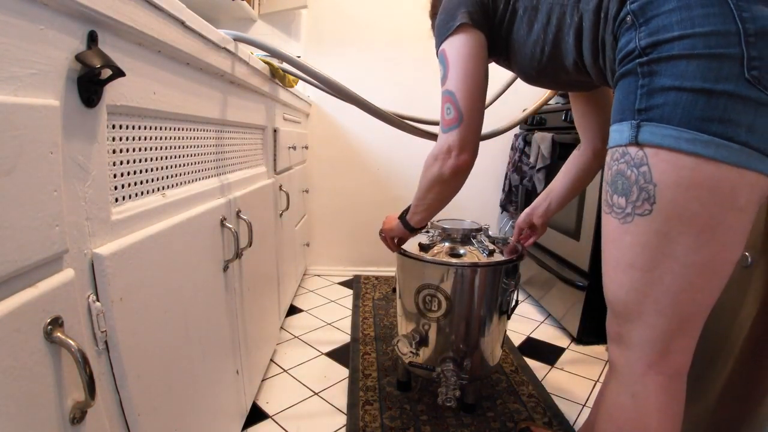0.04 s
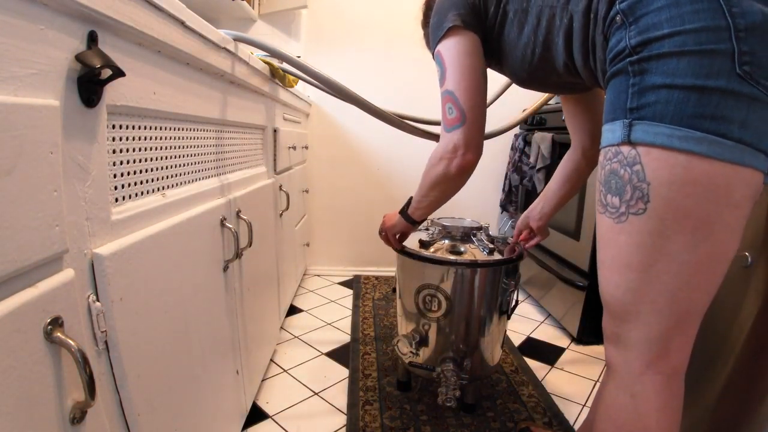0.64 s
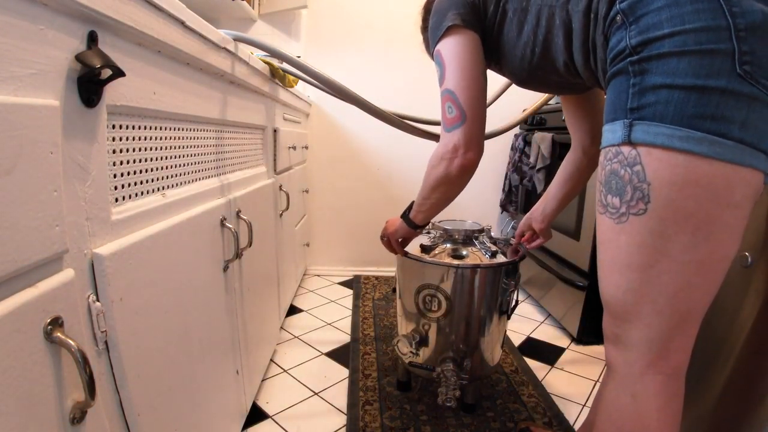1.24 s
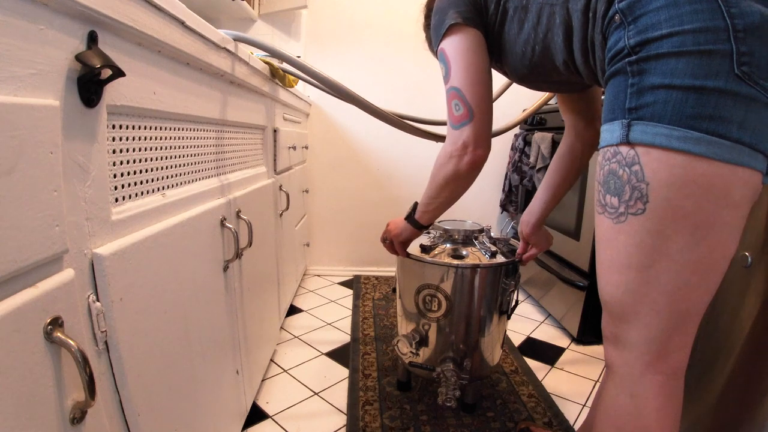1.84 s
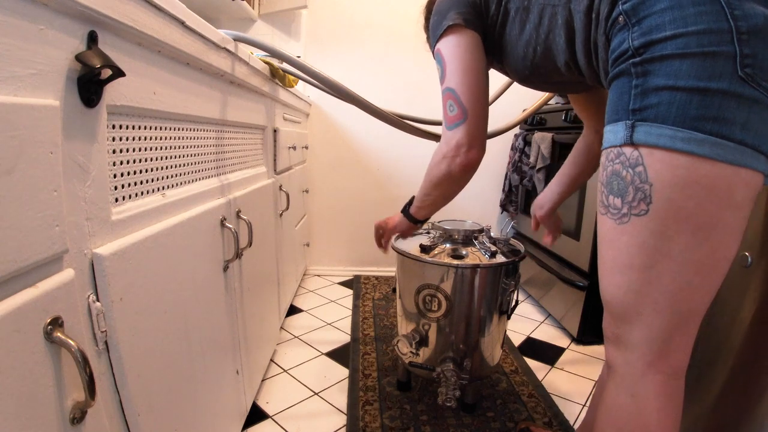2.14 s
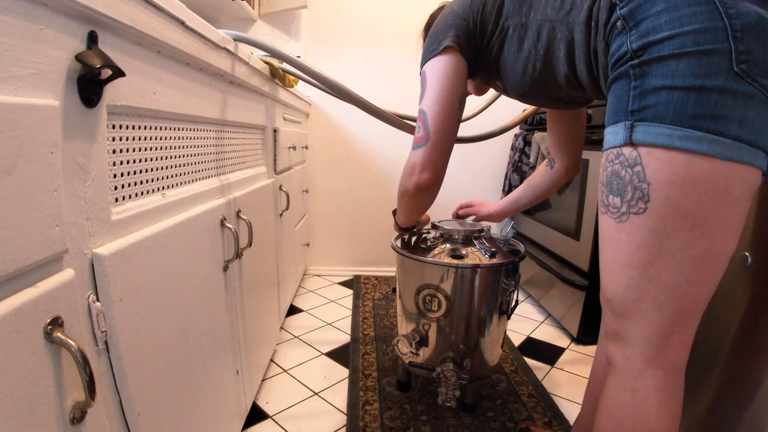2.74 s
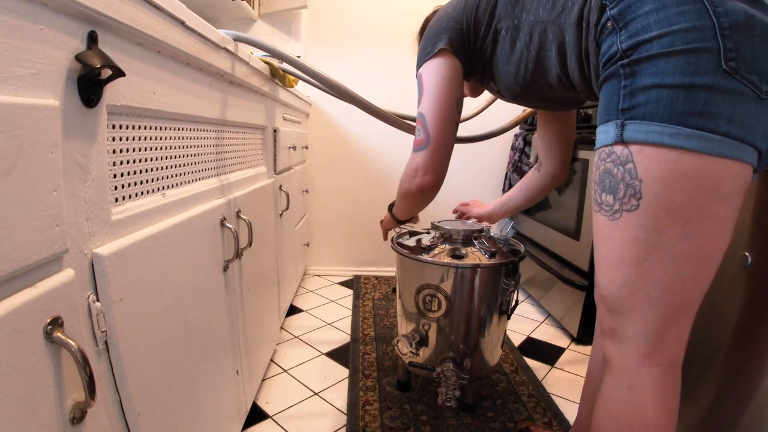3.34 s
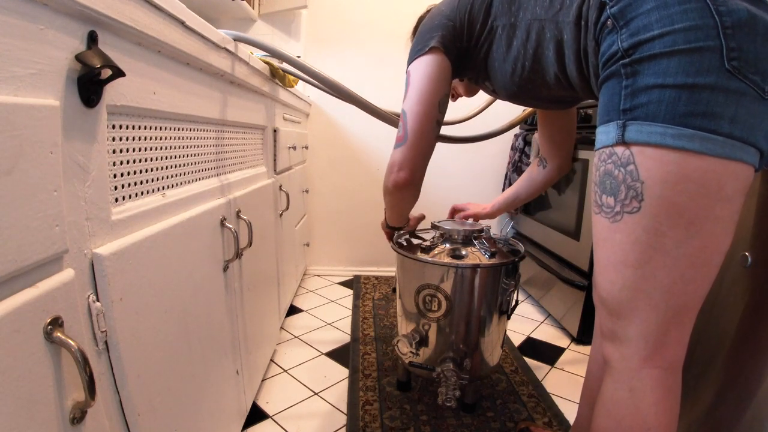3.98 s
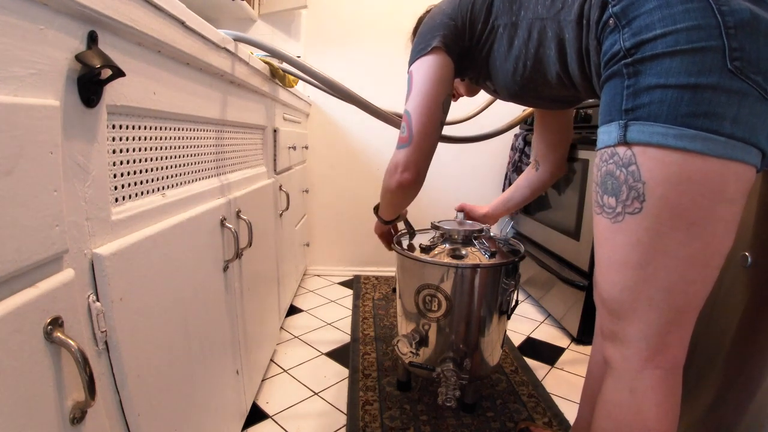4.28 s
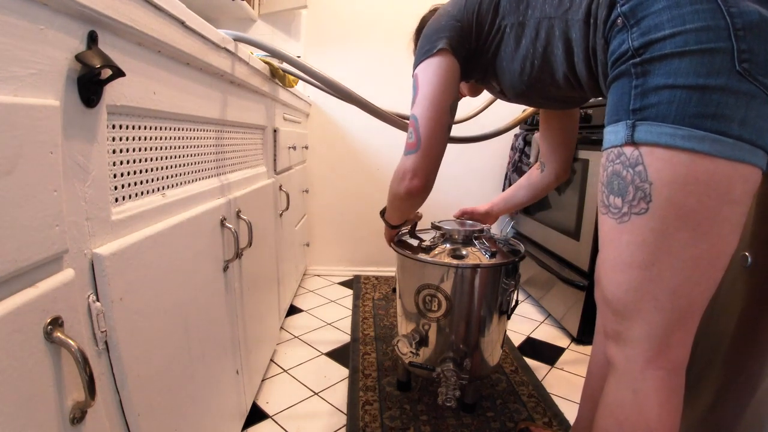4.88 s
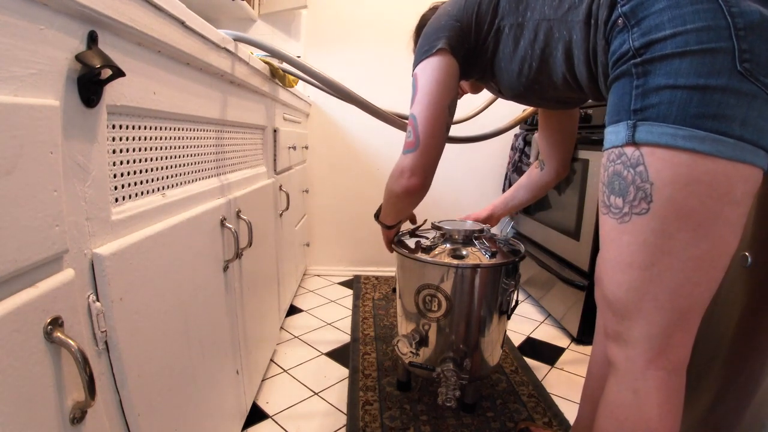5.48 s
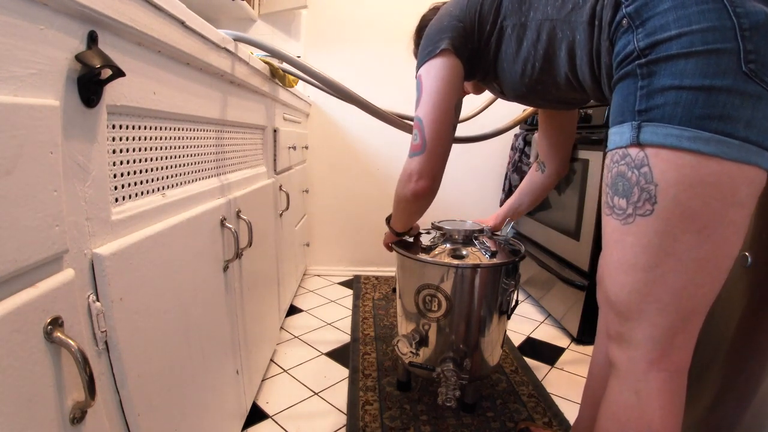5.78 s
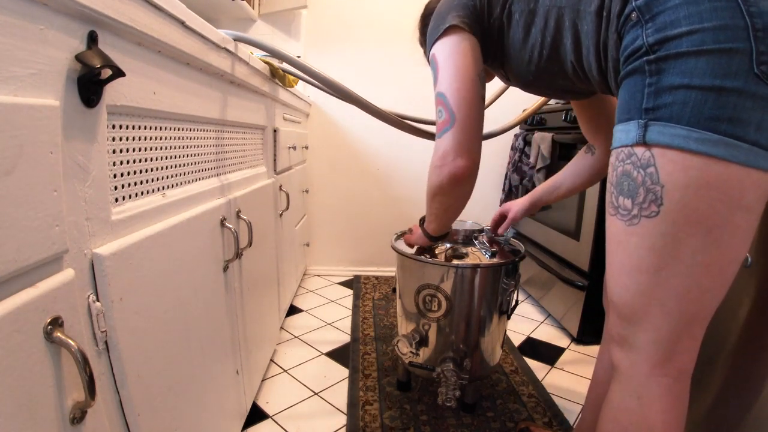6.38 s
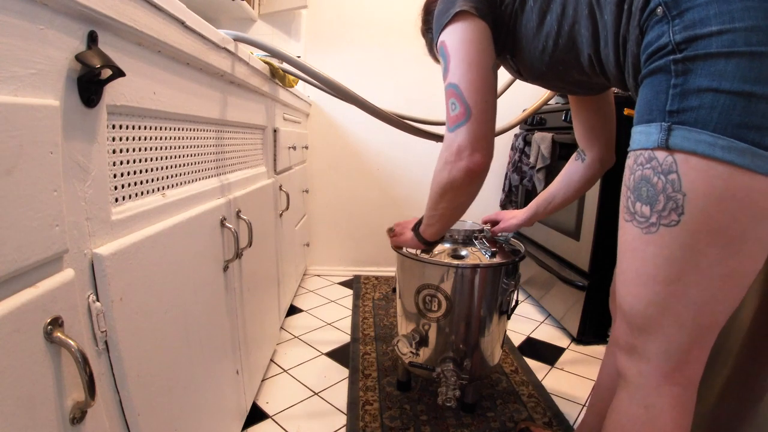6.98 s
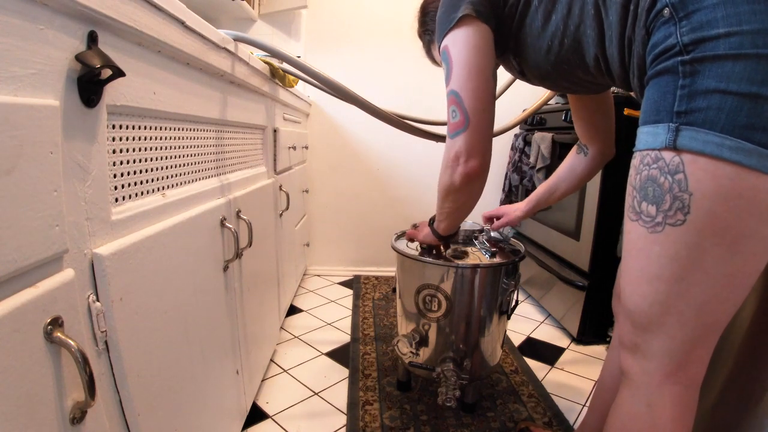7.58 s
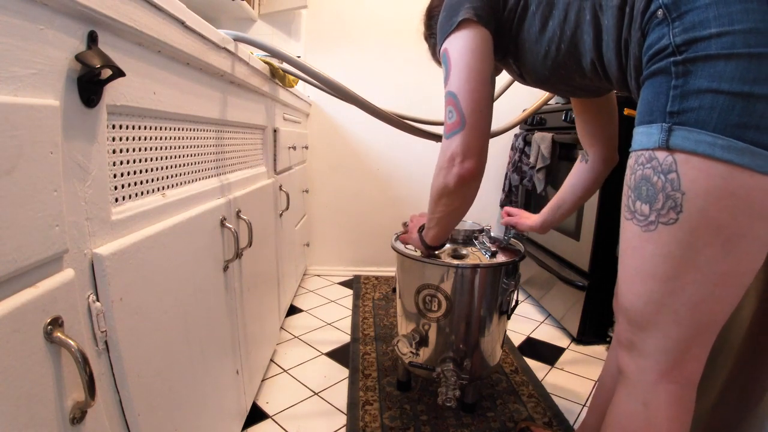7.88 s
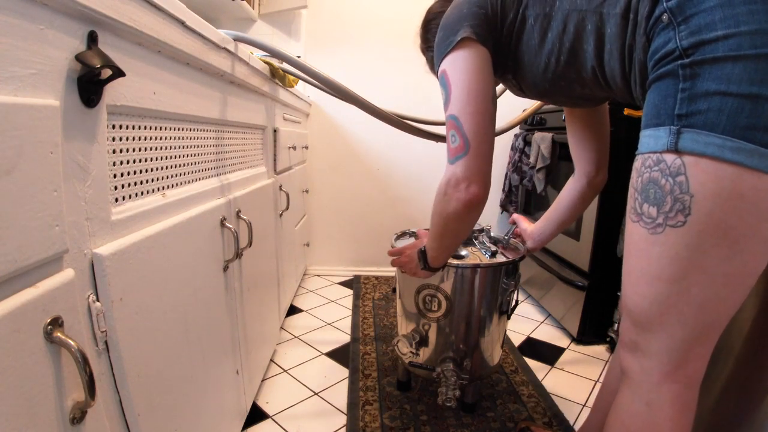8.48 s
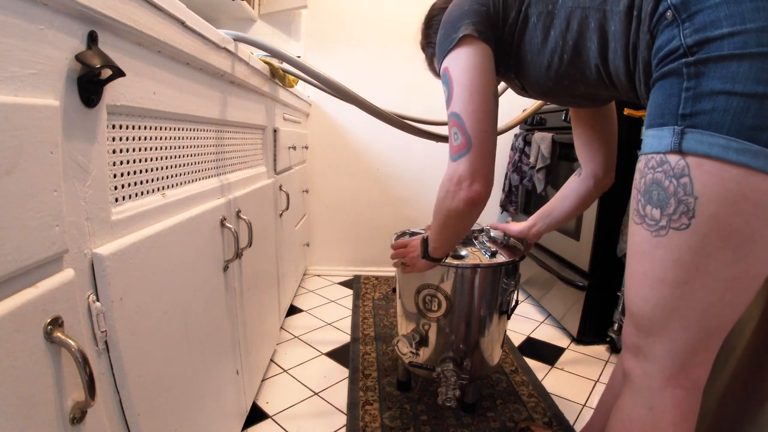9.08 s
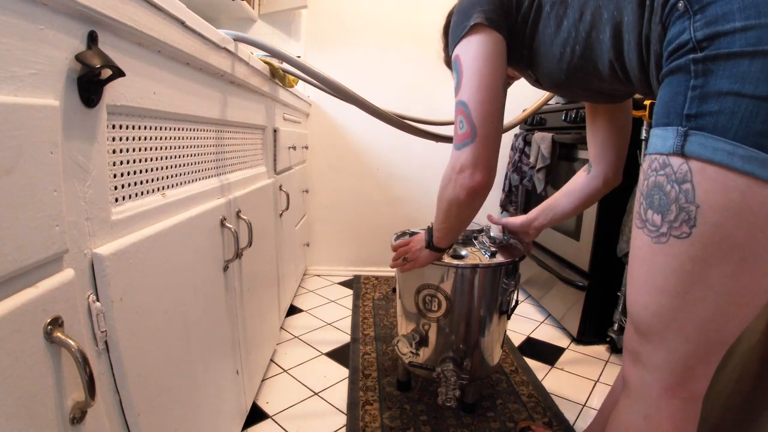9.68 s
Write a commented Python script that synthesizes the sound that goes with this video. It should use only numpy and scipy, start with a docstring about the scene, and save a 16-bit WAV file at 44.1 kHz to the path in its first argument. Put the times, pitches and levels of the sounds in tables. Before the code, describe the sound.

Steel latches clatter and snap on a metal pot lid, with clanks, twangs and dull thuds over a low kitchen hum.

```python
"""First come soft knocks over a low hum: a steel lid settles on a steel pot in a small, hard-walled kitchen.
Then the latches on its rim clatter and spring open or shut. Each knock thumps the pot, clangs the lid,
twangs the latch wire and clinks its lever, as its hardness and weight decide. In a snap the wire rings
out; loose wires nudge the lid, and hands rub it and give dull thuds. The room rings on, and an automatic
volume control squashes the loudest snaps and turns the hum down after them."""
import sys
import numpy as np
from scipy import signal
from scipy.fft import rfft, irfft
from scipy.io import wavfile

SR = 44100
rng = np.random.default_rng(int(sys.argv[2]) if len(sys.argv) > 2 else 0)


def file_out(sig):
    """Save sig as 16-bit WAV at sys.argv[1]."""
    # one column per channel
    cols = np.atleast_2d(sig).T
    # limit, then scale
    lim = np.clip(cols, -1, 1)
    pcm = np.round(lim * 32767).astype(np.int16)
    wavfile.write(sys.argv[1], SR, pcm)


N = 429093

# Lid, hook and lever knocking on the rim: t/s, level/dB, hardness/dB (bare steel high, cushioned low),
# weight/dB (how much reaches the pot), direct sound over room/dB, lid f/Hz, wire f/Hz, lever f/Hz
KNOCKS = [(0.062, -51.5, -18, 2.5, -11, 773, 1660, 3800), (0.582, -49, -9, -4.5, -5, 856, 2380, 3580),
          (1.478, -60, -6, -1, -17, 800, 1790, 3080), (2.117, -56, -12.5, 6, -5, 860, 1600, 2900),
          (2.4772, -45, -5, -6, -1.5, 920, 1700, 3640), (2.5424, -52.5, -2.5, -1.5, -2, 905, 1930, 3580),
          (2.5739, -45.5, -2.5, -21, 2, 920, 2280, 3370), (2.658, -49, -8.5, -4, -2, 866, 2040, 3100),
          (2.7501, -47.5, 0.5, -27, 0, 940, 2020, 3560), (2.7868, -47, 7, 2, 0, 830, 1800, 3650),
          (2.853, -49, -14, 3, -10.5, 882, 1970, 3800), (2.9556, -24.5, -2.5, -12, -2.5, 720, 1940, 4000),
          (3.0275, -27, 0.5, -4, 0.5, 910, 1940, 3780), (3.3399, -48, -6.5, -12, -5.5, 845, 2050, 3700),
          (3.353, -48.5, -1, -10, 4.5, 818, 2020, 3750), (3.839, -60.5, 0.5, -8, 1, 875, 1910, 3870),
          (3.8939, -52, -11, -24, 7, 920, 2140, 3820), (3.9952, -52.5, -2.5, -12, 3, 1030, 1900, 2950),
          (4.3258, -36, 6.5, -5, -1, 940, 2570, 4970), (4.3675, -28.5, -6, -13, 6, 976, 1500, 5470),
          (4.4479, -37.5, 1.5, -3, -1, 900, 1690, 2920), (4.521, -29, -1.5, -10, 4.5, 752, 1970, 2980),
          (4.7018, -43.5, -3.5, -17, -0.5, 875, 2060, 3770),
          (4.7261, -46.5, -5.5, -0.5, 6, 1180, 2110, 4200), (4.7913, -46, 4, -8.5, 2.5, 1325, 1920, 2920),
          (4.8316, -46.5, 6, 1, 0, 820, 1670, 4940), (4.9115, -37, -2, -6.5, -1, 825, 1900, 3130),
          (4.9425, -46.5, 4, -8.5, 7, 650, 2480, 3880), (4.982, -59.5, 13, -1.5, 4, 890, 1910, 5700),
          (5.177, -58, -4, 8.5, -4, 880, 2180, 5000), (5.347, -38.5, 1.5, -1.5, -2, 1080, 2110, 4200),
          (5.416, -20, 3, -11, -1.5, 1197, 1980, 3726), (6.8599, -54, 18, -25, -2.5, 1180, 2100, 5700),
          (6.8952, -27, -5.5, -6.5, 0.5, 910, 2125, 3490),
          (7.9234, -52.5, -4.5, -13, -2.5, 1170, 1860, 3250), (8.1323, -45, -0.5, 4.5, 0, 1080, 2300, 4810),
          (8.1854, -34.5, -1.5, -22, 1, 1150, 1680, 4670), (8.3014, -26, -3.5, -9, 1.5, 800, 1940, 3130),
          (8.7753, -37.5, -1.5, 7.5, 0.5, 715, 2120, 4700)]
def knock(row, soft_db=-51.5, palm_from_s=6.3, fingertip_db=-15):
    """The lid clangs; the harder the contact, the more the small parts of the latch join in."""
    s, db, hard_db, weight_db, direct_db, lid_hz, wire_hz, lever_hz = row
    wire_db = -2.5 + 0.58 * hard_db
    # A softly struck lever stays longer in contact, so its sharp edge fades.
    softness_db = max(soft_db - db - hard_db, 0)
    edge_db = hard_db - 12 - 0.8 * softness_db
    levels_db = db + np.array([weight_db, 0, wire_db, hard_db, edge_db])
    # A palm on the lid damps the ringing; light fingertip knocks still ring freely.
    damped = s > palm_from_s and weight_db > fingertip_db
    return s, blow(levels_db, lid_hz, wire_hz, lever_hz, direct_db, freedom=0.74 if damped else 1.25)


# Latches springing open or shut with a wire twang: t/s, level/dB, weight/dB, wire f/Hz
SNAPS = [(5.7464, -16.5, -7.5, 1850), (6.5017, -46.5, 3.5, 2300), (9.3578, -16, 2, 2020)]
def snap(row):
    """The tight wire lets go: it rings above everything else, and the lever slaps over."""
    s, db, weight_db, wire_hz = row
    levels_db = db + np.array([weight_db, 0, 11.5, 6, -8.5])  # pot, lid, wire, lever, edge
    return s, blow(levels_db, lid_hz=524, wire_hz=wire_hz, lever_hz=4500,
                   direct_db=-8.5, freedom=0.73, wire_lift=11.5)


# A loose wire loop, held in the fingers, touching the lid: t/s, level/dB, wire f/Hz
NUDGES = [(6.7091, -54.5, 2100), (7.249, -56, 2300), (7.3271, -49.5, 2280), (7.618, -53.5, 2330),
          (7.7123, -57.5, 2420), (7.778, -59, 2170), (8.0104, -49, 1800), (8.7495, -48, 2170),
          (9.1, -49.5, 1790), (9.2572, -50, 1980)]
# Each part's share of a nudge: level/dB for pot, lid, wire, lever, edge
NUDGE_SHARES = [0, 0, -1, -4, -14]
def nudge(row, top_hz=4850):
    """A light, damped touch of wire on lid; the soft contact makes hardly any treble."""
    s, db, wire_hz = row
    sound = blow(db + np.array(NUDGE_SHARES), lid_hz=1090, wire_hz=wire_hz, lever_hz=2970,
                 direct_db=1, freedom=0.49)
    return s, signal.lfilter(*signal.butter(2, top_hz, fs=SR), sound)


# The tone colour of each part, from the deep pot to the thin, sharp edge: f/Hz, relative level/dB
POT = [(20, -2.5), (85, -10.5), (120, -4.5), (195, 2.5), (260, -11.5), (305, -5), (370, -24.5),
       (600, -44.5), (3000, -100)]
LID = [(250, -33.5), (380, -10), (490, -4.5), (750, -1.5), (1200, 0.5), (1450, -8.5), (2200, -45.5),
       (9000, -89.5)]
WIRE = [(300, -60), (900, -38.5), (1400, -4), (1900, 3), (2500, -1.5), (3000, -15), (5000, -46),
        (14000, -82)]
LEVER = [(400, -73), (1700, -37.5), (2700, -3.5), (4500, -3.5), (7000, -2.5), (8700, -12), (11000, -29.5),
         (16000, -65.5)]
EDGE = [(1500, -51), (6000, -33.5), (8700, -12), (10000, 2), (11500, -11), (14000, -14), (15500, -30)]
# Pitches that ring in every blow, the room's low notes and the steel's higher ones:
# f/Hz, width/Hz, average boost/dB
SHARED_RINGS = [(122.9, 11, 9), (194.2, 86, 7), (300.6, 11, 5.5), (498.7, 15, 8), (585, 10, 3),
                (630, 12, 6), (669.6, 23, 7.5), (718, 12, 6), (782, 14, 8), (1090, 7.4, 6.5),
                (1148, 18, 4.5), (1477, 34, 6), (1750, 31, 5), (1973, 34, -0.5), (2071, 59, 2.5),
                (2350, 120, 1), (3140, 140, 4.5), (3465, 28, 5.5), (3850, 62, 5), (4900, 300, 1)]
def blow(levels_db, lid_hz, wire_hz, lever_hz, direct_db, freedom, wire_lift=5.0, size=32768):
    """One hit shakes all five parts; more freedom lets lid, wire and lever ring more at their own pitch."""
    hz = np.fft.rfftfreq(size, 1 / SR)
    rings_db = sum(boost * (.5 + rng.random()) * bump(hz, f, width) for f, width, boost in SHARED_RINGS)
    rings_db += contact_overtones(hz)
    colours_db = [read(POT, hz),
                  read(LID, hz) + freedom * 9 * bump(hz, lid_hz, width_hz=170),
                  read(WIRE, hz) + freedom * wire_lift * bump(hz, wire_hz, width_hz=360),
                  read(LEVER, hz) + freedom * 5.5 * bump(hz, lever_hz, width_hz=700),
                  read(EDGE, hz)]
    hit_in_room = kitchen(direct_db)
    attack = round(.04 * SR)  # each part's level is set over its first 40 ms
    sound = np.zeros(size)
    for level_db, colour_db in zip(levels_db, colours_db):
        part = irfft(hit_in_room * ringing_filter(colour_db + rings_db))
        sound += gain_of(level_db) * part / rms(part[:attack])
    return sound


def contact_overtones(hz, count=40, boost_db=5):
    """Each spot that is hit favours its own overtones of the steel: a random boost in dB."""
    place, strength = rng.random((2, count))
    centres_hz = 1000 * 14 ** place  # 1 to 14 kHz
    return sum(boost_db * k ** 2 * bump(hz, f, width_hz=0.025 * f) for f, k in zip(centres_hz, strength))


# Hands and the lid's seal bumping the pot: t/s, level/dB, f/Hz
THUDS = [(0.635, -34.5, 191), (0.64, -38.5, 36), (1.03, -41.5, 185), (1.085, -52, 63), (1.429, -49, 177),
         (4.46, -52, 66.4), (4.913, -29, 132), (5.298, -45.5, 126), (6.39, -39.5, 167), (6.43, -39, 116),
         (8.339, -29.5, 130), (9.372, -17, 120), (5.752, -22.5, 178)]
def thud(row, size=32768, sharpness=7.2, boost_db=1):
    """A soft push wakes only one low note of the pot."""
    s, db, pitch_hz = row
    hz = np.fft.rfftfreq(size, 1 / SR)
    low_note = 1 / (1 + 1j * sharpness / 2 * (hz / pitch_hz - pitch_hz / (hz + 1)))
    sound = irfft(kitchen(direct_db=3.2) * low_note ** 2)
    return s - .005, gain_of(db + boost_db) * sound / abs(sound).max()


# A lever sliding over its catch just before it grips: t/s, level/dB, length/s
SLIDES = [(4.29, -55, 0.055), (5.71, -48, 0.017), (6.485, -58, 0.016), (8.265, -34.5, 0.059),
          (9.335, -44, .023)]
def slide(row, size=32768, slips_per_s=1500, wire_db=-5, lever_db=-10):
    """Tiny slips grow as the lever is pressed home, and sound through lid, wire and lever."""
    s, db, length = row
    hz, t = np.fft.rfftfreq(size, 1 / SR), np.arange(size) / SR
    slips = rng.standard_normal(size) * (rng.random(size) < slips_per_s / SR)
    pressure = (t < length) * t / length
    colour = gain_of(read(LID, hz)) + gain_of(read(WIRE, hz) + wire_db)
    colour += gain_of(read(LEVER, hz) + lever_db)
    sound = irfft(rfft(slips * pressure) * kitchen(direct_db=0) * ringing_filter(20 * np.log10(colour)))
    return s, gain_of(db) * sound / rms(sound[t < 2 * length])


# Fingers sliding over the lid, feeling for the latches: t/s, level/dB
RUBBING = [(2.3, -101), (2.5, -58), (2.9, -66), (3.0, -73), (3.701, -69), (3.85, -62), (4.2, -66.5),
           (4.351, -49), (5.2, -61), (5.499, -76), (6.502, -84.5), (6.7, -57), (7.2, -66.5), (7.701, -62.5),
           (8.651, -67.5), (9.198, -50), (9.4, -86)]
# The tone colour of skin on steel: f/Hz, relative level/dB
SKIN = [(200, -36.5), (500, 2.5), (900, 5.5), (1400, 2.5), (2200, -1.5), (3500, -9.5), (7000, -16.5),
        (10000, -22), (13000, -36), (16000, -57.5)]
def rubbing(slips_per_s=350, spread_db=4):
    """Skin catches and slips on the steel; the room smears the slips into a rustle."""
    strengths = rng.standard_normal(N) * gain_of(spread_db * rng.standard_normal(N))
    slips = strengths * (rng.random(N) < slips_per_s / SR)
    colour = gain_of(read(SKIN, np.fft.rfftfreq(N, 1 / SR)))
    skin_slips = irfft(rfft(slips) * colour, N)
    rustle = signal.oaconvolve(skin_slips, irfft(kitchen(direct_db=1.5)))[:N]
    level_db = np.interp(np.arange(N) / SR, *np.transpose(RUBBING))
    return gain_of(level_db) * rustle / rms(rustle)


# A faint squeak of a latch hinge, at its loudest: t/s, level/dB, f/Hz
SQUEAKS = [(3.615, -68, 3880)]
def squeak(row, size=16384, swell_s=0.021, width_hz=300):
    """A hinge sticks and slips: a short, fuzzy whistle that swells and fades."""
    s, db, pitch_hz = row
    hz, t = np.fft.rfftfreq(size, 1 / SR), (np.arange(size) - size / 2) / SR
    whistle = irfft(rfft(rng.standard_normal(size)) * bump(hz, pitch_hz, width_hz) ** 2)
    return s + t[0], gain_of(db) * whistle / rms(whistle) / np.cosh(t / swell_s)


# Echoes off the nearby cabinet, floor and oven: delay/s, gain
ECHOES = [(.0011, 0.1), (.0028, -0.55), (.0072, 0.6), (0.0127, -.45), (0.0169, 0.4)]
# How long kitchen and steel shell together take to fade by 60 dB: f/Hz, time/s
RING_TIMES = [(50, 0.37), (130, 0.051), (250, 0.33), (500, 0.4), (1000, 0.36), (2000, 0.38), (4000, 0.38),
              (7000, 0.39), (10000, 0.33), (16000, 0.31)]
def kitchen(direct_db, size=32768, chatter_s=0.0063, chatter=0.24, build_s=0.0017):
    """The spectrum of one hit as it reaches the ear: a chattering crack, near echoes and a fading tail."""
    t = np.arange(size) / SR
    crack = chatter * rng.standard_normal(size) * np.exp(-t / chatter_s)
    crack[0] = 1
    direct = crack.copy()
    for delay, gain in ECHOES:
        add(direct, delay, gain * crack)
    far_echoes = rng.standard_normal(size) * (rng.random(size) < .1 + 10 * t)  # ever more crowded
    hz, age, bands = signal.stft(far_echoes, SR, nperseg=256)
    fade = 1000. ** (-age / read(RING_TIMES, hz)[:, None])
    tail = signal.istft(bands * fade, SR)[1][:size] * (1 - np.exp(-t / build_s))
    return rfft(gain_of(direct_db) * direct / rms(direct) + tail / rms(tail))


# The tone colour of the room's hum: f/Hz, relative level/dB
HUM = [(20, -7.5), (60, -4), (95, -10), (150, -5.5), (215, -2.5), (260, -11), (305, -9), (365, -18.5),
       (600, -18.5), (880, -16.5), (1400, -22.5), (2400, -34.5), (7300, -38.5), (16000, -70.5)]
def hum(level_db=-55):
    """Steady appliance and air noise, coloured by the room's own low notes."""
    colour = gain_of(read(HUM, np.fft.rfftfreq(N, 1 / SR)))
    noise = irfft(rfft(rng.standard_normal(N)) * colour, N)
    return gain_of(level_db) * noise / rms(noise)


# The drone of a kitchen appliance: f/Hz, level/dB
APPLIANCE_TONES = [(59.5, -64), (194, -67), (229, -60.5)]
def appliance(width_hz=5):
    """An appliance drones: narrow bands of noise, heard as low, wavering tones."""
    hz = np.fft.rfftfreq(N, 1 / SR)
    peaks = sum(gain_of(db) * bump(hz, f, width_hz) ** 2 for f, db in APPLIANCE_TONES)
    sound = irfft(rfft(rng.standard_normal(N)) * peaks, N)
    total_gain = np.linalg.norm(gain_of([db for f, db in APPLIANCE_TONES]))
    return total_gain * sound / rms(sound)


def gain_of(db):
    """Turns decibels into a number to multiply by."""
    return 10 ** (np.asarray(db) / 20)


def rms(x):
    """The average strength of a signal (root mean square)."""
    return np.sqrt(np.mean(x ** 2) + 1e-20)


def read(points, hz):
    """Reads between a table's rows along a log-frequency axis."""
    f, value = np.transpose(points)
    return np.interp(np.log(hz + 1), np.log(f + 1), value)


def bump(hz, centre_hz, width_hz):
    """A peak of height 1 around one ringing pitch."""
    return 1 / (1 + (2 * (hz - centre_hz) / width_hz) ** 2)


def add(mix, s, sound):
    """Mixes a sound in at s seconds."""
    part = mix[max(round(s * SR), 0):][:len(sound)]
    part += sound[:len(part)]


def ringing_filter(db):
    """A filter with this tone colour that rings only after it is struck (minimum phase)."""
    cepstrum = irfft(db * np.log(10) / 20)
    half = len(cepstrum) // 2
    cepstrum[1:half] *= 2
    cepstrum[half + 1:] = 0
    return np.exp(rfft(cepstrum))


def smooth(x, seconds):
    """Follows a signal with a short lag."""
    memory = np.exp(-1 / (seconds * SR))
    return signal.lfilter([1 - memory], [1, -memory], x)


def recover(over_db, db_per_s):
    """Holds each peak and lets it fall at a steady rate."""
    fall = np.arange(N) * db_per_s / SR
    return np.maximum.accumulate(over_db + fall) - fall


def scene():
    """Lid, latch and hand sounds over the hum, the same in both ears."""
    mix = hum() + appliance() + rubbing()
    for table, source in ((KNOCKS, knock), (SNAPS, snap), (NUDGES, nudge),
                          (SLIDES, slide), (THUDS, thud), (SQUEAKS, squeak)):
        for row in table:
            add(mix, *source(row))
    return np.array([mix, mix])


def record(dry, threshold_db=-19, slow_share=0.43, slope=0.95, attack_s=0.0026, top_hz=15600):
    """Loud hits turn the volume down; it comes back fast, then slowly. The highest treble is cut off."""
    power_db = 10 * np.log10(smooth(dry[0] ** 2, seconds=0.0029) + 1e-12)
    over_db = slope * np.maximum(power_db - threshold_db, 0)
    dip_db = np.maximum(recover(over_db, db_per_s=55), recover(slow_share * over_db, db_per_s=5))
    turned_down = dry * gain_of(-smooth(dip_db, attack_s))
    squashed = np.tanh(turned_down)  # the start of a snap slips through and overloads
    low_pass = signal.firwin(255, top_hz, window=("kaiser", 9), fs=SR)
    return signal.oaconvolve(squashed, low_pass[None], "same")


dry = scene()
out = record(dry)
file_out(out)
```